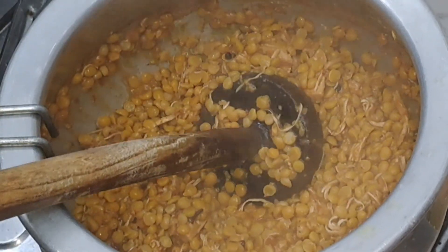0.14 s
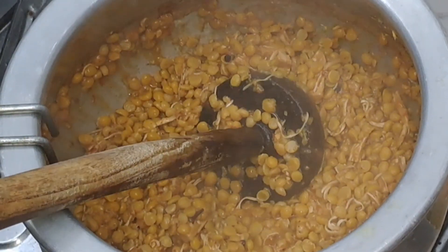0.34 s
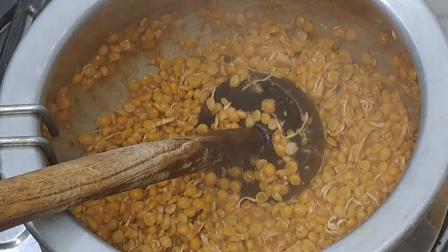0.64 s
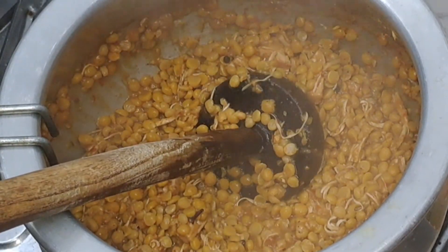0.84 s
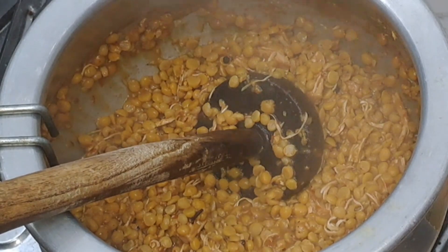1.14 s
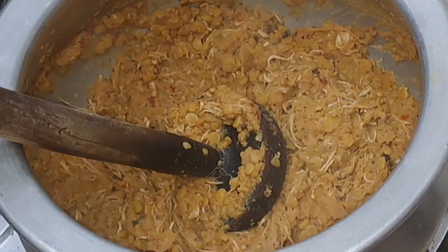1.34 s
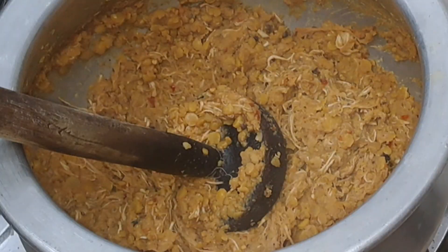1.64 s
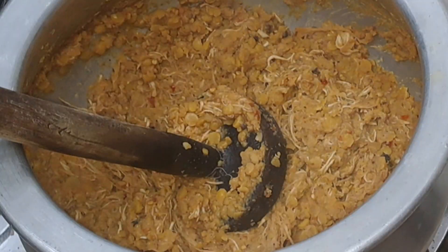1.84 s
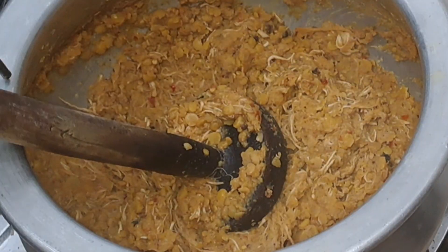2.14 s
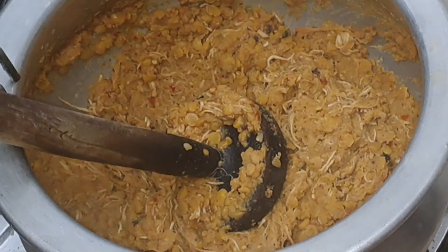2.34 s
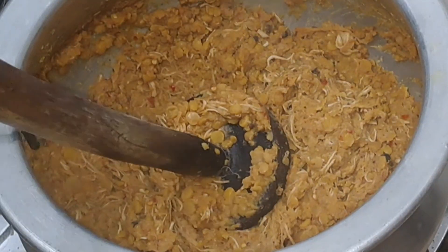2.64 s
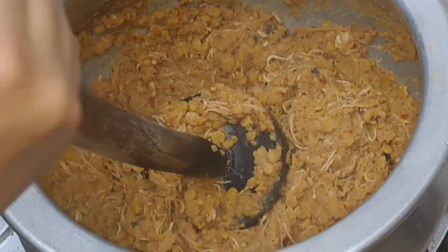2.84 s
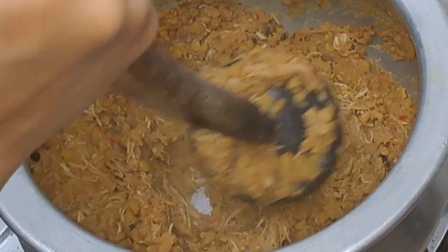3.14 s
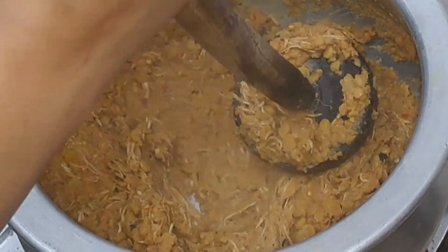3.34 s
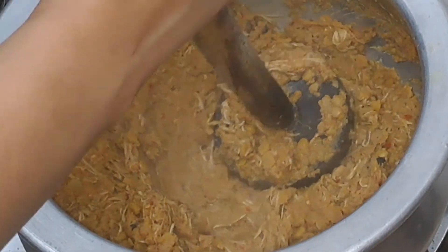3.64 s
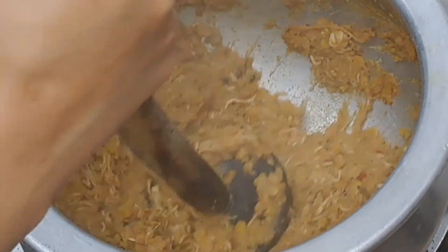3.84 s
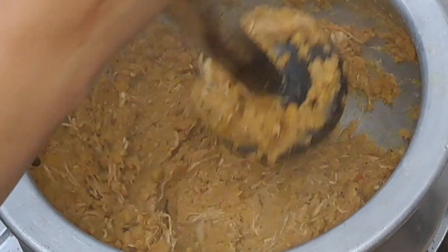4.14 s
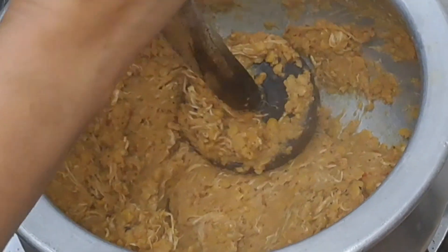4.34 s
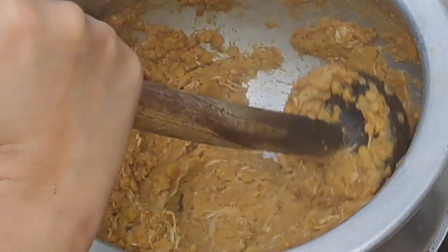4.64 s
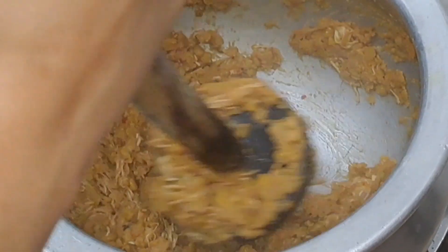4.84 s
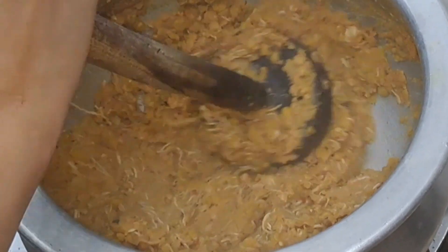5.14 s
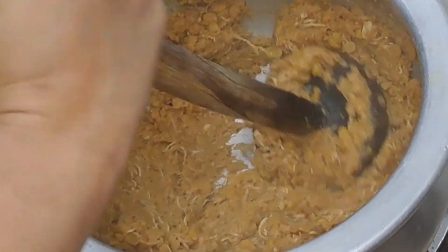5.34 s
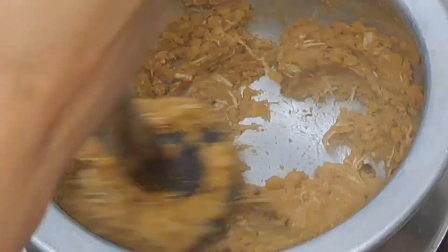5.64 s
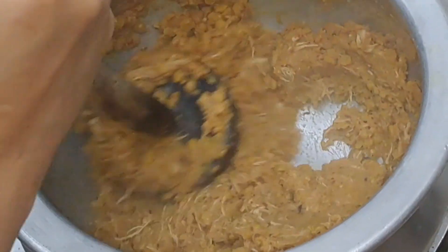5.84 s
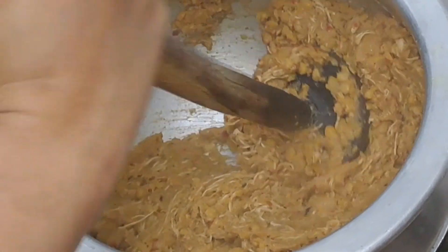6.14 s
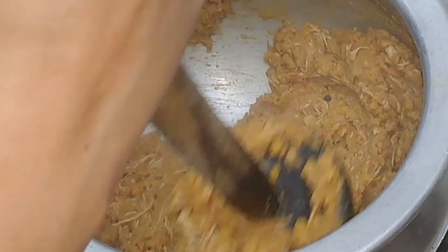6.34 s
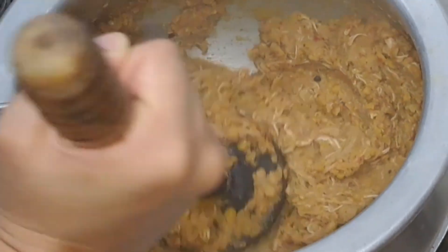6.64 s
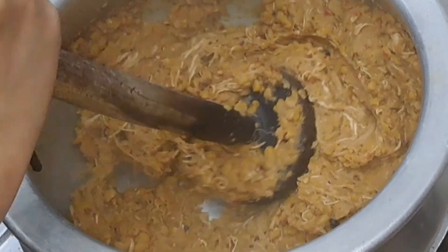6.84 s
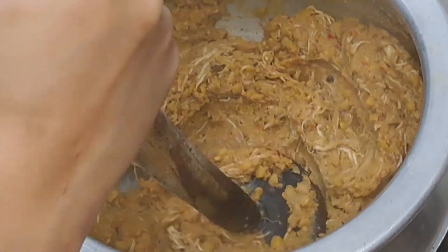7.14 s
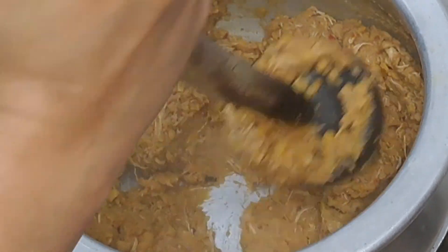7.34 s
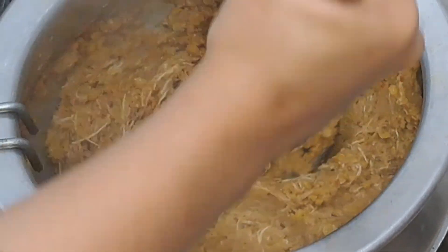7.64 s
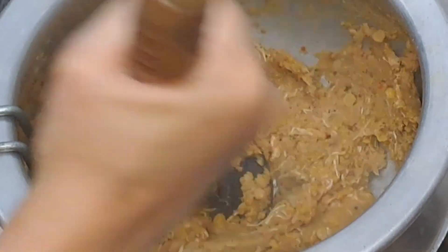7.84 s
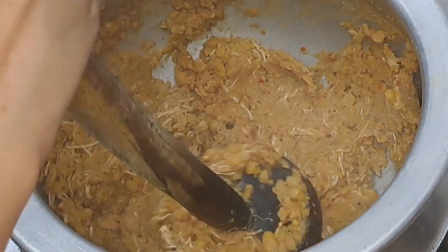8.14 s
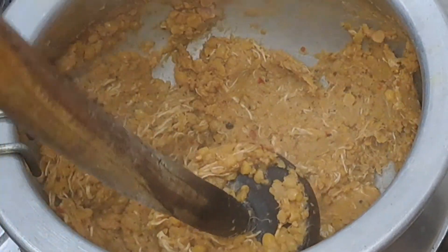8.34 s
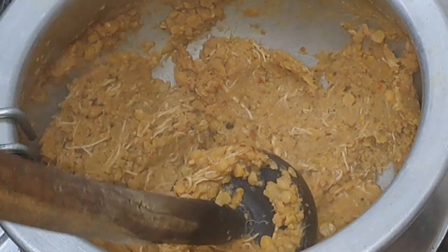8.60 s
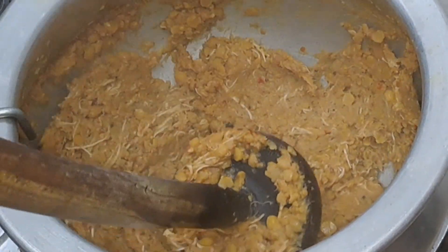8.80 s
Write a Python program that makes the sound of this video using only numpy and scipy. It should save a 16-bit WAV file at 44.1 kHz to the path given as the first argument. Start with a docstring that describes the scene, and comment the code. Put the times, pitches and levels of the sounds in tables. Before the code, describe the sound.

Dull knocks and gritty grinding of mashing in a metal pot, a loose steel handle clinking early, one very hard blow, faint kitchen hum.

```python
"""A fuzzy hum (wavering sine), murmur, hiss and fizz (shaped noise) run underneath. A wooden masher soon
thumps a heavy pot of soft food (rough contacts through damped modes) and grinds (a stream of small jolts).
All sound drops out for a tenth of a second at 1.3 s. From 2 s a loose steel part of the handle clinks
(decaying sines) and slides (filtered noise), from 3 s the wet mash snaps (short filtered contacts), and the
hardest blows fall at 5.7 s. A hard-walled kitchen answers blows, clinks and snaps with decaying noise."""
import sys
import numpy as np
from scipy import signal
from scipy.fft import rfft, irfft, next_fast_len
from scipy.io import wavfile
from scipy.ndimage import uniform_filter1d, map_coordinates

SR = 44100
rng = np.random.default_rng(int(sys.argv[2]) if len(sys.argv) > 2 else 0)


def generate_wav(sig):
    """Save sig (samples, or channels by samples) to the path in sys.argv[1] as 16-bit PCM at SR."""
    pcm = np.round(np.clip(np.atleast_2d(sig).T, -1, 1) * 32767).astype(np.int16)
    wavfile.write(sys.argv[1], SR, pcm)


N = 395577
SPAN = 2 ** 15  # samples in one short sound
HZ = np.fft.rfftfreq(SPAN, 1 / SR)


def amp(db):
    """Decibels to a linear factor."""
    return 10 ** (np.asarray(db) / 20)


def unit(x):
    """Scale to an rms of 1."""
    return x / np.sqrt(np.mean(np.abs(x) ** 2) + 1e-20)


def along(points, hz):
    """Interpolate (Hz, value) points on a log frequency axis."""
    f, v = np.transpose(points)
    return np.interp(np.log(hz + 1), np.log(f + 1), v)


def curves(rows):
    """One value per sample for each column after the time."""
    seconds, *columns = np.transpose(rows)
    return [np.interp(np.arange(N) / SR, seconds, column) for column in columns]


def wobble(rate):
    """A smooth random curve with rate knots a second."""
    knots = rng.standard_normal(int(N * rate / SR) + 4)
    return map_coordinates(knots, [np.arange(N) * rate / SR])


def filtered(x, response):
    """Filter x by a complex response of frequency."""
    m = next_fast_len(N + SR // 2)
    spectrum = rfft(x, m) * response(np.fft.rfftfreq(m, 1 / SR))
    return irfft(spectrum, m)[..., :N]


def paired(z, alike):
    """Mix two unrelated signals or spectra into left and right of the given likeness (1 is identical)."""
    turn = np.arccos(np.clip(alike, -1, 1)) / 2
    mid, side = z[0] * np.cos(turn), z[1] * np.sin(turn)
    return np.array([mid + side, mid - side])


def peak(hz, centre_hz, width_hz):
    """Causal response of one damped mode."""
    return 1j * hz * width_hz / (centre_hz ** 2 - hz * hz + 1j * hz * width_hz)


def low(hz, edge_hz):
    """Causal two-pole low-pass."""
    return 1 / (1 + 1j * hz / edge_hz) ** 2


def high(hz, edge_hz):
    """Causal two-pole high-pass."""
    return (1j * hz / (edge_hz + 1j * hz)) ** 2


def causal(db):
    """Minimum-phase response with the given gains, by folding the cepstrum."""
    cepstrum = irfft(np.log(amp(db) + 1e-6))
    cepstrum[1:SPAN // 2] *= 2
    cepstrum[SPAN // 2 + 1:] = 0
    return np.exp(rfft(cepstrum))


def rush(spectrum, patchy_db):
    """Stereo noise of rms 1, shaped by a spectrum, with patches of random gain in time and frequency."""
    # Likeness of left and right. Each row: frequency in Hz, likeness.
    likeness = [(60, 0.93), (180, 0.94), (550, 0.41), (1650, 0.097), (4970, 0.025), (15000, 0.01)]
    # Balance of the two sides. Each row: frequency in Hz, left over right in dB.
    balance = [(60, -2), (240, 0.5), (950, 1.5), (3770, 0), (15000, -3)]
    hz, _, z = signal.stft(rng.standard_normal((2, N)), SR, nperseg=2048)
    field = uniform_filter1d(rng.standard_normal(z.shape[1:]), size=16, axis=0)
    field = uniform_filter1d(field, size=3, axis=1)
    z = paired(z * amp(patchy_db * unit(field)), along(likeness, hz)[:, None])
    lean = along(balance, hz) / 2
    z = z * amp(along(spectrum, hz) + [lean, -lean])[..., None]
    return unit(signal.istft(z, SR, nperseg=2048)[1][:, :N])


def background():
    """A fuzzy low hum, the murmur of the house, a hiss with a narrow peak and a fizz that flickers above it."""
    # Steady kitchen sounds before wobble and flicker. Each row: time in seconds, hum peak in dB,
    # then murmur, hiss and fizz rms in dB.
    levels = [(0.0, -41, -47.5, -46, -52.5), (0.6, -42, -48.5, -46, -53.5), (1.3, -43, -46.5, -47, -53),
              (1.37, -50, -53, -45, -53), (2.6, -48, -49.5, -44.5, -53.5), (3.4, -52.5, -48, -42, -50),
              (4.3, -49.5, -50, -43.5, -51.5), (5.1, -48.5, -46, -42, -48.5), (5.9, -49, -49, -43.5, -50.5),
              (6.24, -48, -48.5, -46.5, -55), (6.9, -52, -51.5, -46, -54), (7.45, -50.5, -51, -44.5, -52),
              (7.75, -47, -48, -42, -48.5), (8.3, -49, -50.5, -43, -53), (8.97, -46.5, -50, -43.5, -52)]
    # Tone of the three noises. Each row: frequency in Hz, relative level in dB per Hz.
    murmur_tone = [(12, -45), (20, -50), (43, -7.5), (97, -2), (145, -6), (352, -8.5), (406, -8.5),
                   (549, -11.5), (1090, -13.5), (1850, -25.5), (2500, -46), (3250, -49), (5500, -120)]
    hiss_tone = [(700, -46), (1400, -9), (2060, -7.5), (2730, -14), (3100, -9.5), (4300, -12.5), (5300, -9),
                 (5800, -4.5), (6000, 2.5), (6250, -6), (7000, -23.5), (7600, -66)]
    fizz_tone = [(4000, -26), (6800, -0.5), (7180, -5.5), (8930, -9.5), (11700, 1), (13900, -6.5),
                 (15100, -8), (16000, -11)]
    hum_db, murmur_db, hiss_db, fizz_db = curves(levels)
    turns = np.cumsum(97 + 1.69 * wobble(7.5)) / SR  # the pitch wavers around 97 Hz
    hum = amp(hum_db + 1.06 * wobble(7)) * np.sin(2 * np.pi * turns)
    fuzz = filtered(rng.standard_normal(N), lambda hz: peak(hz, 96.4, width_hz=6.4) ** 2)
    hum = hum + amp(-56) * unit(fuzz)  # narrow noise around the hum
    murmur = amp(murmur_db) * rush(murmur_tone, patchy_db=1.5)
    flicker = wobble(20)  # hiss and fizz flicker together
    hiss = amp(hiss_db + 0.89 * flicker) * rush(hiss_tone, patchy_db=1.5)
    fizz = amp(fizz_db + 1.6 * flicker) * rush(fizz_tone, patchy_db=0.0)
    return hum + murmur + hiss + fizz


def contact_force(seconds, first=1.7):
    """Spectra, left and right, of a contact: a sharp first touch, then a short rough press."""
    # Direct sound of a wide object close by. Each row: frequency in Hz, left-right likeness.
    near_likeness = [(100, 1), (300, 0.95), (700, 0.98), (2000, 0.1)]
    t = np.arange(SPAN) / SR
    press = rfft(rng.standard_normal((2, SPAN)) * np.exp(-t / max(seconds, 3e-4)))
    touch = first * np.sqrt(seconds * SR / 20)  # a flat spectrum is a single click
    return paired(press, along(near_likeness, HZ)) + touch


def with_peak(spectrum, db):
    """The sound of a spectrum, scaled to a peak level."""
    x = irfft(spectrum)
    return amp(db) * x / np.abs(x).max()


def placed(s, sound, pan_db, wet_db):
    """A short sound plus the kitchen's answer: noise in which each frequency dies at its own speed."""
    # Decay of the kitchen. Each row: frequency in Hz, time to fall 60 dB in seconds.
    decay = [(120, 0.16), (300, 0.6), (1000, 0.42), (3000, 0.42), (7000, 0.36), (14000, 0.12)]
    # Width of the kitchen's answer. Each row: frequency in Hz, left-right likeness.
    room_likeness = [(100, 1), (300, 1), (700, 0.19), (2000, 0.049)]
    hz, t, z = signal.stft(rng.standard_normal((2, SPAN)), SR, nperseg=256)
    z = paired(z, along(room_likeness, hz)[:, None])
    z = z * amp(-60 * t / along(decay, hz)[:, None])
    tail = signal.istft(z, SR, nperseg=256)[1][:, :SPAN]
    # the walls answer from 0.6 ms and in full from 2.6 ms
    tail = tail * np.clip(np.arange(SPAN) / SR / 0.002 - .3, 0, 1)
    wet = signal.fftconvolve(sound[:1], tail / np.linalg.norm(tail[0]), axes=1)
    both = amp(wet_db) * wet[:, :SPAN] + sound
    return round(s * SR), both * amp([[pan_db / 2], [-pan_db / 2]])


def add(track, start, sound):
    """Lay a short sound into the track, cut off at its end."""
    track[:, start:start + sound.shape[1]] += sound[:, :track.shape[1] - start]


def pot(hz):
    """Causal response of the filled pot: damped modes of alternating sign."""
    # Modes of the pot. Each row: frequency in Hz, width in Hz, relative level in dB.
    modes = [(237, 104, 5), (343, 60, -5), (476, 270, -9), (768, 37, 2.5), (796, 61, -33),
             (1290, 550, -22.5), (1585, 20, -35)]
    return sum((-1) ** k * amp(db) * peak(hz, c, w) for k, (c, w, db) in enumerate(modes))


def masher():
    """Each blow is a short rough contact: the struck spot thuds and knocks, and the whole pot's modes answer."""
    # Blows on the pot, peaks before room and pan. Each row: start in seconds, thud peak in dB,
    # thud pitch in Hz, knock peak in dB, knock pitch in Hz, crack peak in dB.
    blows = [(0.209, -32, 350, -21, 824, -26), (0.239, -25, 406, -36, 850, -45),
             (0.329, -32.5, 213, -45, 740, -29), (2.255, -40, 253, -34.5, 740, -30),
             (3.019, -45, 220, -41, 606, -27), (3.317, -39, 218, -34.5, 940, -36),
             (3.904, -39.5, 200, -42, 1130, -31), (4.339, -42, 213, -39, 1130, -26.5),
             (4.361, -30, 153, -27, 695, -39), (4.419, -25.5, 267, -35.5, 643, -36),
             (4.448, -31.5, 240, -40, 716, -32), (4.502, -38, 277, -48, 700, -39),
             (4.752, -27.5, 208, -43, 587, -40), (4.788, -30.5, 207, -53, 713, -39),
             (4.901, -39, 226, -35, 1270, -26.5), (5.138, -32, 300, -31, 770, -43),
             (5.169, -24, 250, -38, 816, -34), (5.44, -24.5, 234, -33, 614, -29),
             (5.489, -26.5, 191, -46, 829, -27), (5.705, -24.5, 227, -17.5, 970, -35),
             (5.714, -22, 206, -16.5, 1310, -26), (5.718, -11.5, 195, -7.5, 1270, 0),
             (5.727, -9.5, 296, -6, 825, -1), (5.749, -16.5, 424, -16, 586, -14),
             (5.799, -22.5, 246, -20, 567, -12.5), (5.869, -28, 330, -24, 743, -28),
             (6.184, -33.5, 222, -38.5, 1210, -37), (6.231, -21.5, 255, -23.5, 714, -17),
             (6.269, -25.5, 196, -27.5, 900, -32), (6.335, -29.5, 227, -58, 685, -31),
             (6.387, -30, 217, -25.5, 660, -34), (6.419, -26.5, 223, -40, 651, -52),
             (6.466, -15, 406, -20.5, 560, -23), (6.477, -28, 218, -40, 610, -36),
             (6.503, -24, 470, -33, 606, -41), (6.638, -24, 255, -28.5, 713, -24),
             (6.689, -31, 248, -52, 563, -30), (7.355, -45, 226, -34.5, 960, -32),
             (7.496, -17, 628, -16, 720, -19), (7.509, -23.5, 201, -41, 700, -36),
             (7.538, -25, 400, -30, 640, -27), (7.668, -34, 216, -37, 568, -41),
             (7.892, -28.5, 288, -28, 700, -28)]
    # Tone of the crack. Each row: frequency in Hz, relative level in dB per Hz.
    crack_tone = [(700, -21.5), (1300, -2), (2000, -3.5), (3000, -8), (5000, -10), (6200, -12), (7500, -22),
                  (9500, -20.5), (12500, -17.5), (15000, -27), (17000, -12)]
    track = np.zeros((2, N))
    body = pot(HZ) + amp(-11.5)
    crack = causal(along(crack_tone, HZ))
    for s, thud_db, thud_hz, knock_db, knock_hz, crack_db in blows:
        force = contact_force(seconds=0.0061)
        thud = 0.27 * body + peak(HZ, thud_hz, width_hz=64)
        thud = thud * low(HZ, edge_hz=830) * high(HZ, edge_hz=98)
        knock = 0.5 * body + peak(HZ, knock_hz, width_hz=177)
        knock = knock * low(HZ, edge_hz=2100) * high(HZ, edge_hz=456)
        sound = with_peak(force * thud, thud_db) + with_peak(force * knock, knock_db)
        sound = sound + with_peak(force * crack, crack_db)
        add(track, *placed(s, sound, pan_db=0.2, wet_db=2.5))
    track[1] = np.roll(track[1], 5)  # right is 5 samples late: the pot is a little nearer the left
    return track


def grind():
    """The masher slips over the pot floor in many small uneven jolts that shake the pot.
    In each stroke the rumble swells and ebbs; the scrape starts sharply and fades to a rest over the rumble."""
    # Strokes over the pot floor. Each row: start in seconds, length in seconds,
    # rumble level in dB before swell and ebb, scrape level in dB at the start before attack and fade.
    strokes = [(0.213, 0.31, -45.5, -34.5), (2.912, 0.29, -50.5, -47.5), (3.305, .15, -50, -62),
               (3.802, .3, -53, -47), (4.352, 0.21, -51, -44), (4.752, .3, -45, -35.5),
               (5.151, 0.13, -47, -40), (5.408, 0.18, -42.5, -45), (5.741, .4, -46, -15),
               (6.229, 0.29, -42, -33.5), (6.369, 0.12, -40, -38), (6.463, 0.091, -52, -29.5),
               (6.646, 0.21, -47.5, -34), (7.493, 0.31, -50, -45), (7.9, 0.16, -43, -36)]
    rumble_attack_s, scrape_attack_s, release_s = 0.11, 0.003, 0.1
    scrape_fade_db_per_s, scrape_rest_db = 187, 0.5
    jolts = (rng.random((2, N)) < 1200 / SR) * rng.standard_normal((2, N))  # about 1200 a second
    jolts = jolts * amp(2.5 * wobble(25))
    rumble = filtered(jolts, lambda hz: (pot(hz) + amp(-21)) * low(hz, edge_hz=800) ** 2 * high(hz, edge_hz=156))
    bright = filtered(jolts, lambda hz: (pot(hz) + amp(-5.5)) * low(hz, edge_hz=1530) ** 2 * high(hz, edge_hz=403))
    push, scrape = np.zeros((2, N))
    t = np.arange(SR // 2) / SR
    for s, length, rumble_db, scrape_db in strokes:
        start = round(s * SR)
        span = slice(start, start + len(t))
        ebb = np.clip((length - t) / release_s, 0, 1)
        push[span] += amp(rumble_db) * np.clip(t / rumble_attack_s, 0, 1) * ebb
        fade = amp(scrape_db - scrape_fade_db_per_s * t)
        scrape[span] += fade * np.clip(t / scrape_attack_s, 0, 1) * ebb
    scrape = scrape + amp(scrape_rest_db) * push
    return push * unit(paired(rumble, 1.0)) + scrape * unit(paired(bright, 0.24))


def steel():
    """Every clink ticks and rings the steel part's modes, at strengths set by the struck end; sliding sings.
    Each mode radiates its own way, so all but the lowest reach left and right a quarter turn apart."""
    # Clinks, peaks before room and pan. Each row: start in seconds, peak in dB of the modes from 1.5 to 7 kHz,
    # peak of the modes below and of those above in dB over that, struck end from 0 to 1.
    clinks = [(1.9845, -26, -9.5, -20, 0.25), (2.0133, -25.5, -11, -21, 0.6), (2.058, -3.5, -17, -19, 0),
              (2.0729, -5.5, -13, -12.5, 0.28), (2.4523, -22.5, -11, -30, 0.7),
              (2.5633, -31, -13, -18, 0.7), (2.5944, -33, -4.5, -20, 0.2), (2.7829, -3, -14.5, -31, 0.9),
              (2.7998, -19.5, -3, -27, 0.86), (2.8181, -17.5, -4.5, -26, 0.93),
              (2.8463, -9.5, -12.5, -30, 0.85), (2.8602, -18, -21, -21, 0.7),
              (2.9175, -19.5, -37, -16, 0.7), (2.9357, -22.5, -26, -26, 0.8),
              (3.2893, -31, -16, -18.5, 0.34)]
    # Modes of the part. Each row: frequency in Hz, width in Hz before the damping factor,
    # relative level in dB struck at end 0, the same struck at end 1.
    modes = [(221.5, 9.4, -9, -8), (505, 41, -22, -13), (708, 62, -36, -8), (937, 12, -19, -10.5),
             (1253, 19, -4, -26), (1390, 130, -14.5, -11), (1824, 35, -8.5, -15), (2009, 33, -7, 0.5),
             (2160, 25, -1.5, -17.5), (2116, 62, -5.5, 3), (2290, 33, -5, -7), (2435, 9.1, -12, 1.5),
             (2450, 99, -11, -3), (2984, 45, -15, -4), (2967, 73, -1.5, 5.5), (2930, 9.2, -22.5, -17.5),
             (3390, 23, -9, -3.5), (3450, 50, 1.5, -13), (4152, 83, -2.5, -6), (4054, 34, 0.5, -4.5),
             (4840, 270, -8, -11), (5020, 29, -7, -15), (5560, 73, -9, -13), (5340, 35, -31.5, -29.5),
             (5890, 50, -8, -25), (6314, 125, -11, -2), (7250, 90, -25, -16), (7660, 86, -16, -32),
             (9800, 230, -19, -34), (11500, 240, -17, -15)]
    # The part slides before it drops. Each row: time in seconds, level in dB.
    rub = [(2.4, -82), (2.47, -52), (2.56, -56), (2.66, -47), (2.72, -48.5), (2.78, -38), (2.81, -80)]
    track, t = np.zeros((2, N)), np.arange(SPAN // 4) / SR
    centre, width, one_db, other_db = np.transpose(modes)[..., None]
    group = np.digitize(centre[:, 0], [1500, 7000])
    tick = high(HZ, edge_hz=2200) * low(HZ, edge_hz=2500)
    for s, db, dull_db, bright_db, end in clinks:
        end = np.clip(end, 0, 1)
        level_db = one_db + end * (other_db - one_db) + rng.normal(0, 1.5, (2, len(modes), 1))
        apart = rng.choice([-1, 1], centre.shape) * np.pi / 4 * (centre > centre[0])
        phase = rng.uniform(0, 2 * np.pi, centre.shape) + np.array([apart, -apart])
        damping = 0.94 + 1.5 * end  # struck at the far end, the part rests on the pot and dies sooner
        decay = np.exp(-np.pi * width * damping * t)
        ring = amp(level_db) * width * decay * np.sin(2 * np.pi * centre * t + phase)
        ring = ring * (1 - np.exp(-t / 0.0014))  # soft onset
        sound = with_peak(contact_force(0.0056, first=1.0) * tick, db - 7)
        for k, over_db in enumerate([dull_db, 0, bright_db]):
            sound = sound + with_peak(rfft(ring[:, group == k].sum(1), SPAN), db + over_db)
        add(track, *placed(s, sound, pan_db=0.3, wet_db=-2.5))

    def sing(hz):
        """Sliding sings in some of the lower modes."""
        return sum(amp(db) * peak(hz, c, w) ** 2 for c, w, _, db in modes[3:12])

    slide = unit(filtered(rng.standard_normal((2, N)), sing))
    return track + amp(curves(rub)[0]) * slide


def mash():
    """The sticky mash lets go of wood and metal in small wet snaps: contacts through two broad resonances."""
    # Snaps, peaks before room and pan. Each row: start in seconds, fine part's peak in dB, coarse part's in dB.
    snaps = [(3.129, -36, -29.5), (3.779, -32, -28.5), (3.8994, -34, -43), (4.0118, -33, -39),
             (4.0694, -46, -28), (4.0956, -32, -51), (4.588, -35, -47), (5.46, -41, -28), (6.02, -33, -37),
             (6.9594, -41, -57), (7.0905, -34, -38), (7.1284, -47, -33), (7.145, -42, -34),
             (7.2784, -36, -49), (7.7064, -45, -52), (7.7854, -42, -35), (7.8014, -40, -28.5),
             (8.0394, -36, -49), (8.4277, -33, -51)]
    track = np.zeros((2, N))
    fine, coarse = peak(HZ, 7000, width_hz=8900), peak(HZ, 2460, width_hz=1600)
    for s, fine_db, coarse_db in snaps:
        force = contact_force(0.0034, first=0.47)
        sound = with_peak(force * fine, fine_db) + with_peak(force * coarse, coarse_db)
        add(track, *placed(s, sound, pan_db=2, wet_db=-0.5))
    return track


def scene():
    """All layers summed."""
    return background() + masher() + grind() + steel() + mash()


def record(dry):
    """Everything falls silent for a moment; loud peaks round off; nothing is kept above the band limit."""
    # The silent moment: start in seconds, end in seconds.
    silence = 1.286, 1.381
    top_hz = 15900
    t = np.arange(N) / SR
    outside = np.maximum(silence[0] - t, t - silence[1])
    heard = dry * np.clip(outside / 0.0045, 0, 1)  # 4.5 ms fades
    heard = heard / (1 + np.abs(heard) ** 6) ** (1 / 6)
    return filtered(heard, lambda hz: hz < top_hz)


dry = scene()
out = record(dry)
generate_wav(out)
```